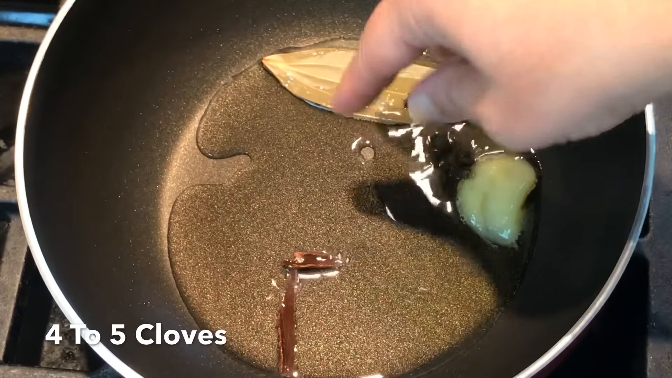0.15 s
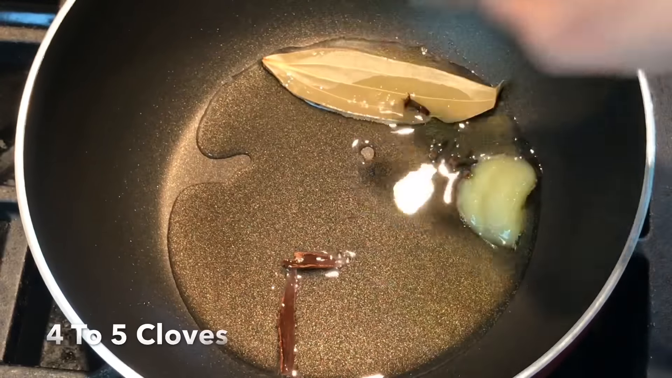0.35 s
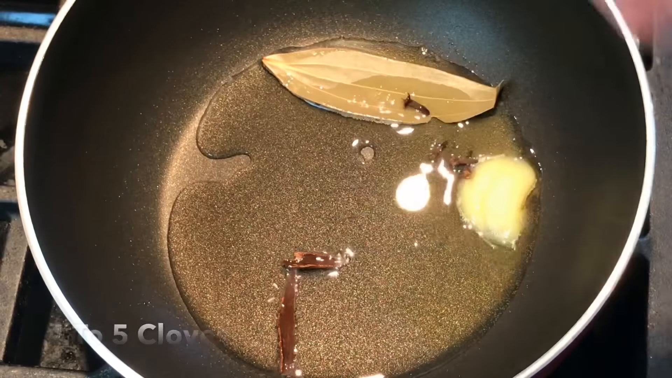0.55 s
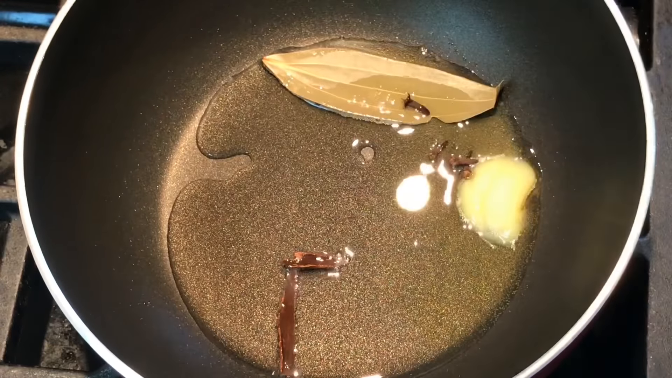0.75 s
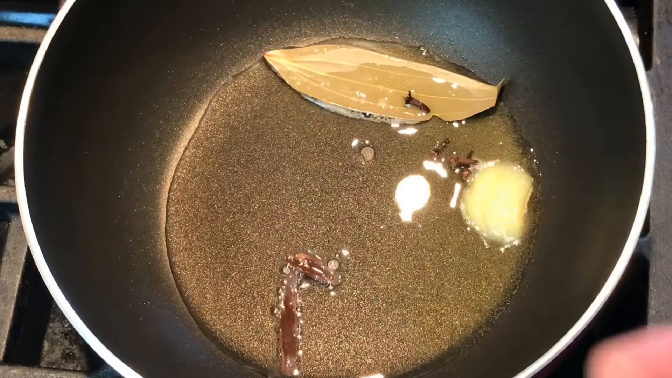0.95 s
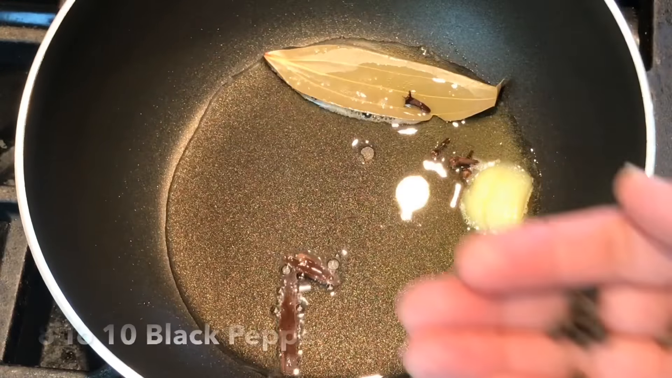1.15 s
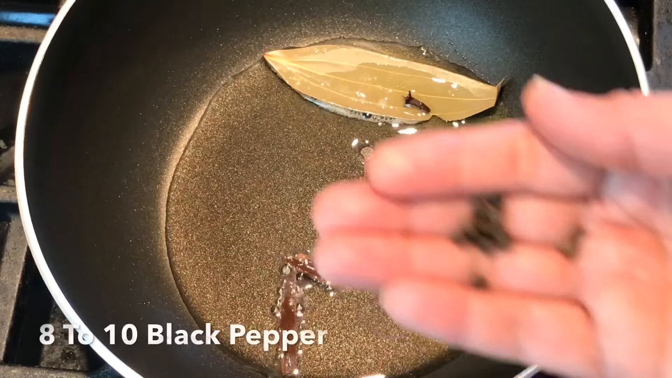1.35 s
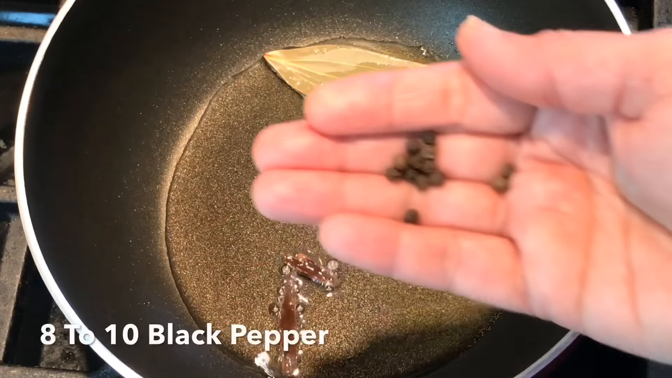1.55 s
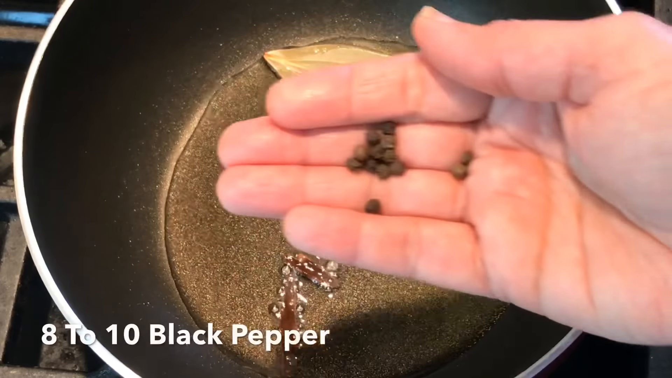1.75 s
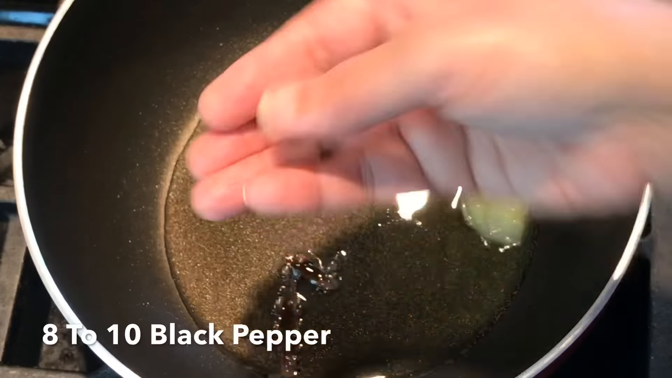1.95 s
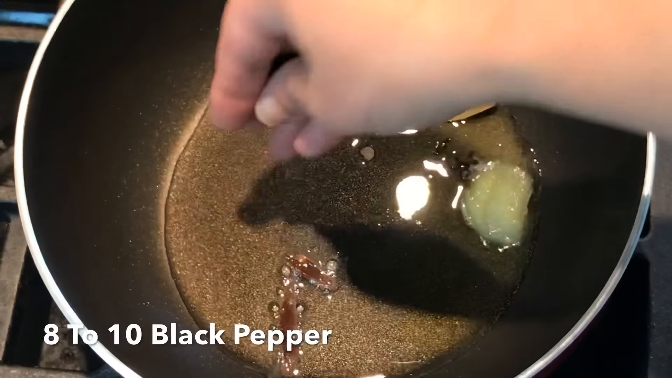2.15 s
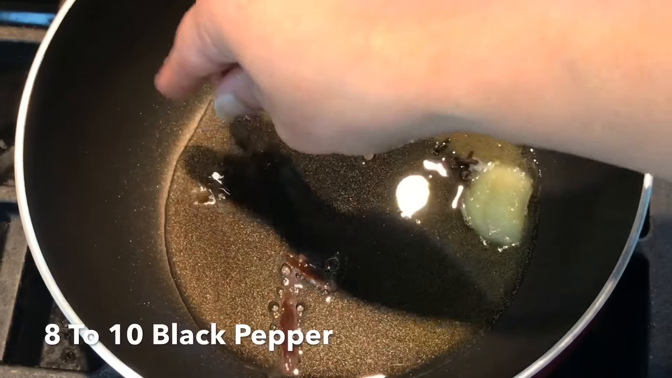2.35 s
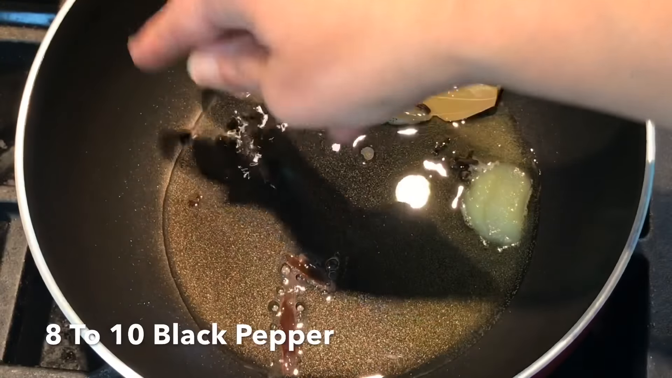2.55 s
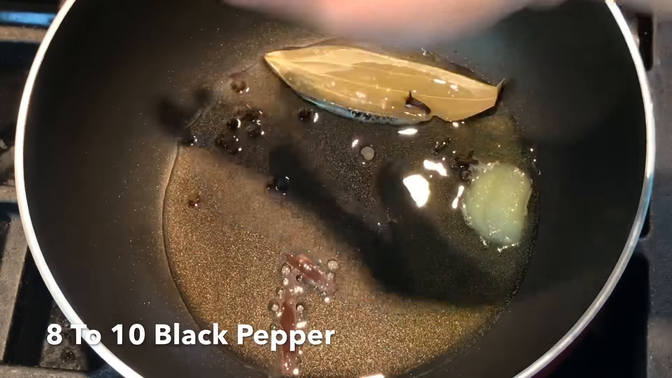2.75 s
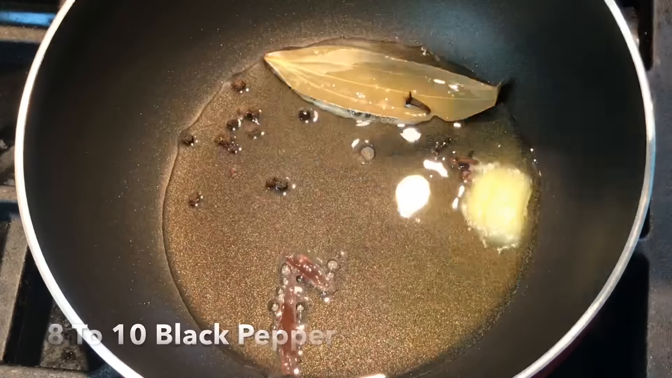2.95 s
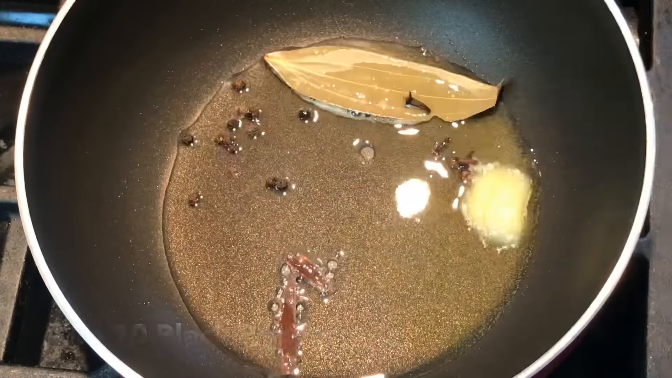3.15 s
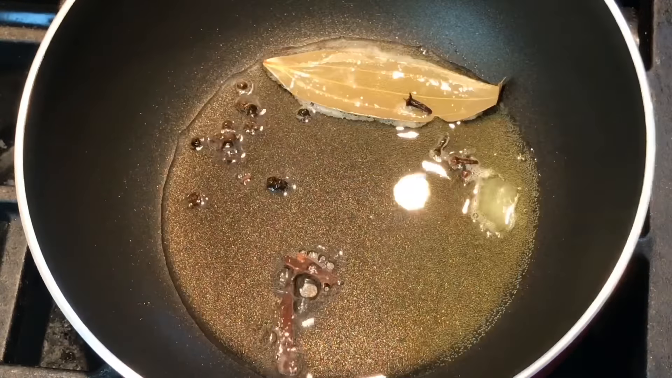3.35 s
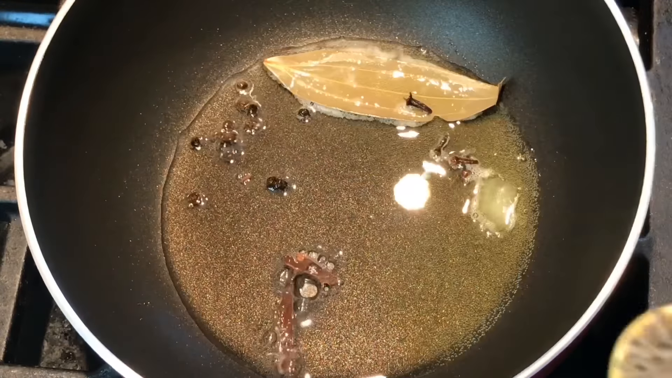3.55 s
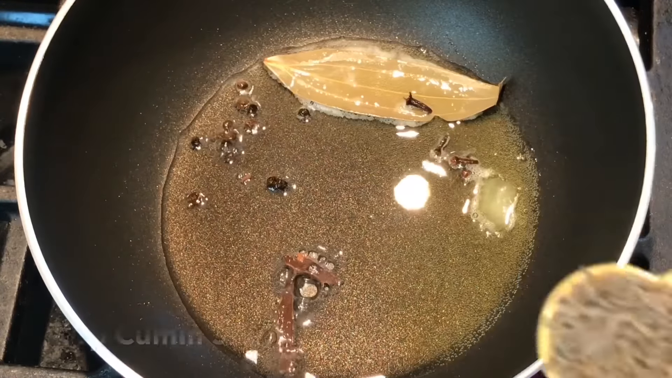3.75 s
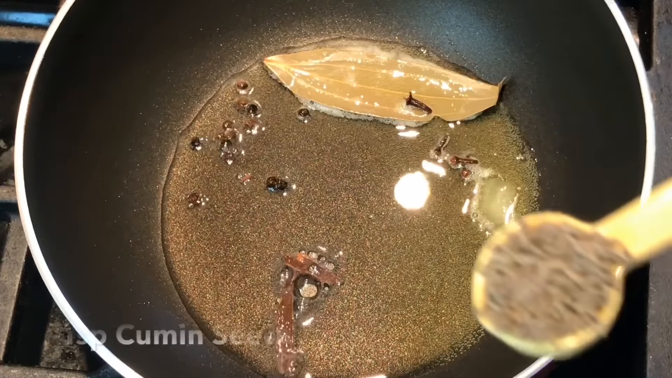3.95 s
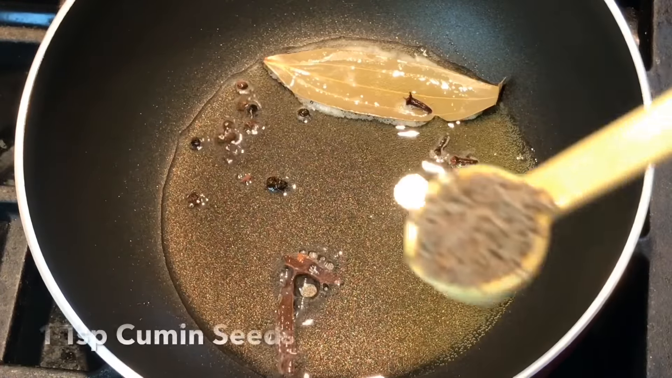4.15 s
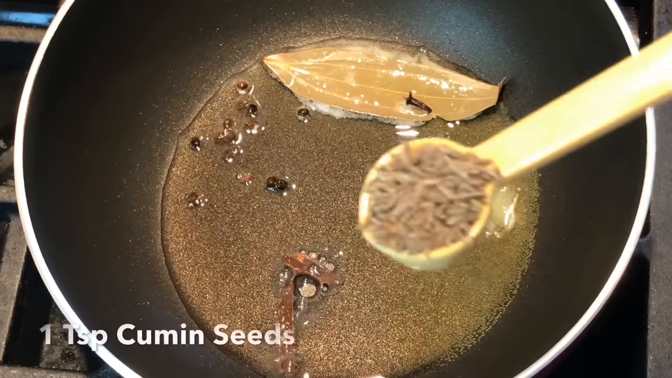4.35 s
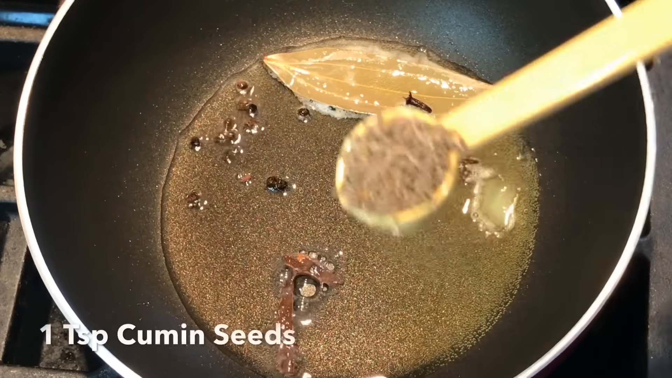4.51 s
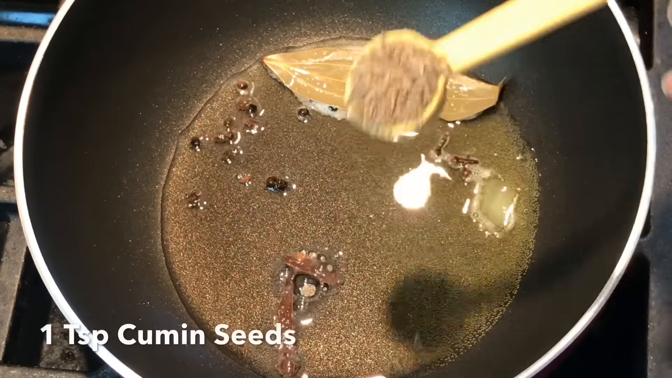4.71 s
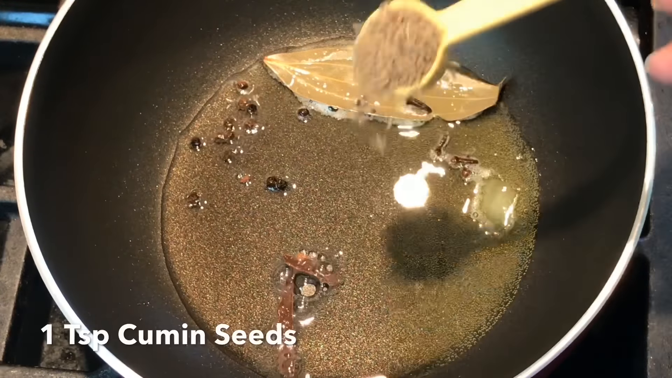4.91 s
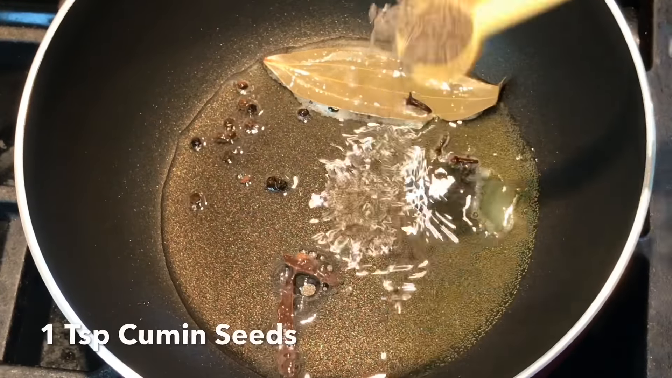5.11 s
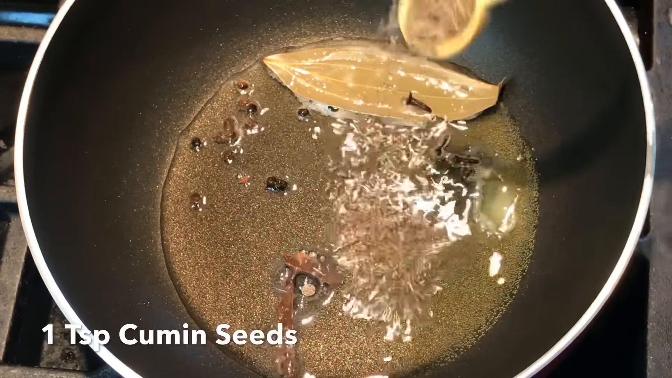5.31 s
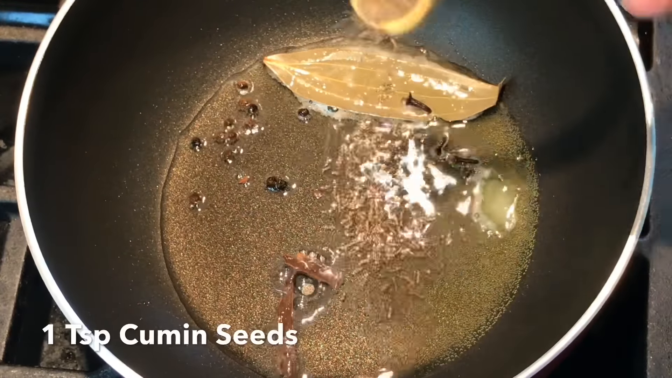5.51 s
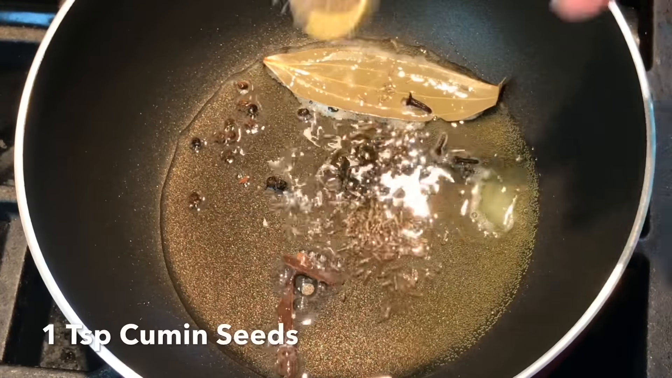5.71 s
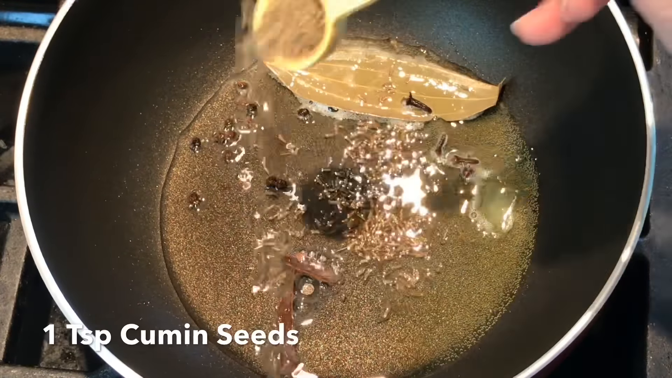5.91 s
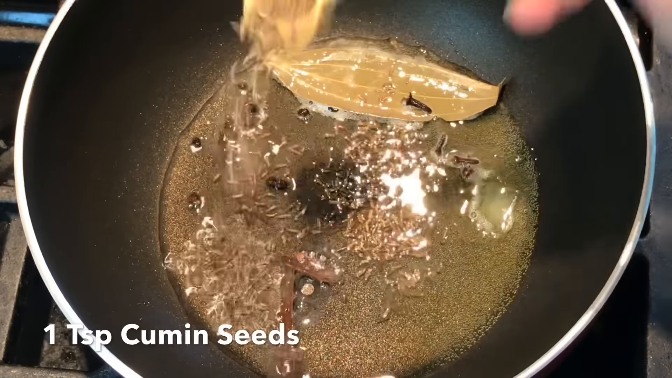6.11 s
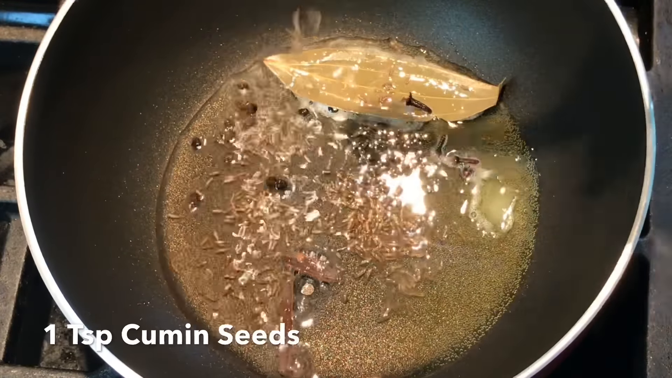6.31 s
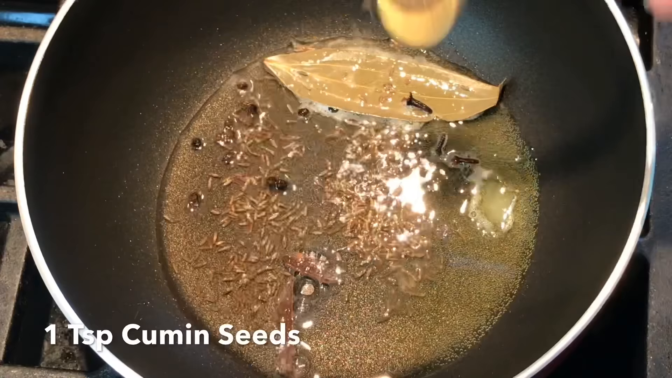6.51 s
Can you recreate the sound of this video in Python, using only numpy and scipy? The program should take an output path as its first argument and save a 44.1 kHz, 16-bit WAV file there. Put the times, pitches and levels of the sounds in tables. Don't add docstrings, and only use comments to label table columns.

```python
import sys
import numpy as np
from scipy import signal
from scipy.fft import rfft, irfft
from scipy.io import wavfile

SR = 44100
rng = np.random.default_rng(int(sys.argv[2]) if len(sys.argv) > 2 else 0)


def unload_wav(signal):
    wavfile.write(
        sys.argv[1],
        SR,
        np.round(np.clip(np.atleast_2d(signal).T, -1, 1) * 32767).astype(np.int16),
    )


def natural_amplitude(level_db):
    exponent = np.asarray(level_db, float) / 20
    return 10 ** exponent


N = 289737
CUTOFF_HZ = 15740
POUR_START_S = 5.12


def rms_one(x):
    return x / np.sqrt(np.mean(x ** 2) + 1e-20)


def at_hz(points, hz):
    point_hz, level_db = np.transpose(points)
    return np.interp(np.log(hz), np.log(point_hz), level_db)


def coloured(x, gain):
    hz = np.fft.rfftfreq(len(x), 1 / SR) + 1
    return rms_one(irfft(rfft(x) * gain(hz) * (hz < CUTOFF_HZ), len(x)))


def drift(rate):
    return coloured(rng.standard_normal(N), lambda hz: 1 / (1 + (hz / rate) ** 2))


def grains(per_s, spread_db):
    sizes = natural_amplitude(spread_db * np.minimum(rng.exponential(1, N), 4)) * rng.choice([-1, 1], N)
    return sizes * (rng.random(N) < per_s / SR)


def swells(rows):
    t = np.arange(N) / SR
    power = 0
    for s, hold, db, rise, fall in rows:
        early, late = np.maximum(s - t, 0), np.maximum(t - s - hold, 0)
        power = power + natural_amplitude(db - rise * early - fall * late) ** 2
    return np.sqrt(power)


def modes(table, t, tilt_db):
    hz, level_db, t60 = np.transpose(table)[:, :, None]
    scatter_db = 2.5 * rng.standard_normal(hz.shape)
    level_db = level_db + tilt_db(hz) + scatter_db - 60 * t / t60
    return np.sum(natural_amplitude(level_db) * np.sin(2 * np.pi * hz * t), axis=0)


# f/Hz, level/dB, t60/s
POT_LOW = [(1030, -13, .08), (1046, -6, .12), (1830, -10, .07), (1903, -1, .12), (1988, -9, .08),
           (2400, -16, .05), (3040, -9, .04)]
POT_HIGH = [(3850, -5, .03), (4600, -2, .03), (5000, -6, .03), (6165, 0, .04), (6430, -4, .04),
            (7027, -6, .06), (8600, -5, .03), (9030, -5, .04), (9450, -5, .03), (9720, -1, .05),
            (11050, -6, .03), (12400, -5, .03)]


def landings(rows, rattle_t60, metal_db):
    out, t = np.zeros(N + 6000), np.arange(6000) / SR
    hz = np.fft.rfftfreq(len(t), 1 / SR) + 1
    for s, peak_db, centre_hz, spread, rattle_db, ring_db in rows:
        def colour_db(f):
            return np.maximum(-3.5 * (np.log(f / centre_hz) / max(spread, .05)) ** 2, -18)

        noise_band = natural_amplitude(colour_db(hz)) * (hz > 2200) * (hz < CUTOFF_HZ)
        noise = rms_one(irfft(rfft(rng.standard_normal(len(t))) * noise_band, len(t)))
        echo_delay = np.exp(-2j * np.pi * hz * rng.uniform(.0003, .0008))
        bounce = 1 + .7 * rng.uniform(-1, 1) * echo_delay
        tick_band = natural_amplitude(.8 * colour_db(hz)) * (hz > 2000) * (hz < CUTOFF_HZ)
        lead_in = np.exp(-2j * np.pi * hz * .0002)
        tick = irfft(tick_band * bounce * lead_in, len(t)) * (t < .002)

        hit = tick / np.max(np.abs(tick))
        hit += natural_amplitude(rattle_db + 3.5) * noise * natural_amplitude(-60 * t / rattle_t60) * np.minimum(t / 0.000081, 1)
        hit += natural_amplitude(rattle_db + metal_db) * modes(POT_HIGH, t, lambda f: .7 * colour_db(f))
        hit += natural_amplitude(ring_db) * modes(POT_LOW, t, lambda f: 0 * f)
        at = round(s * SR)
        out[at:at + len(t)] += natural_amplitude(peak_db) * hit
    return out[:N]


# t/s, peak level/dB, centre f/Hz, rattle level re tick/dB
BIG = [(0.0244, -24, 5400, -11), (0.0725, -43, 2600, -10), (0.1097, -19.5, 9800, -18),
       (0.1917, -25.5, 4900, -11), (2.4203, -40, 8500, -4), (2.4625, -17, 11500, -21),
       (2.527, -31, 11500, -11), (2.5349, -22, 9300, -14), (2.5492, -32, 7400, -9),
       (2.5683, -19, 10000, -17), (2.5813, -12, 8800, -23), (2.6003, -24, 7900, -18),
       (2.6084, -27, 7200, -15), (2.6188, -32, 6200, -14), (2.6397, -25, 7000, -12),
       (2.6637, -33, 8200, -14), (2.7156, -43, 6700, -11)]


def cloves_and_peppercorns():
    rows = []
    for s, db, hz, rattle_db in BIG:
        ring_db = -47.5 + .45 * (db + 22.5) - db
        if s < 1:
            ring_db -= 5
        rows.append((s, db, hz, .34, rattle_db, ring_db))
    return landings(rows, rattle_t60=.032, metal_db=-8)


# t/s, peak level/dB, centre f/Hz
SEEDS = [(5.1228, -34, 9400), (5.1457, -32, 11200), (5.1578, -31, 9600), (5.1679, -30, 11200),
         (5.193, -21.5, 8200), (5.2122, -36, 7800), (5.2222, -28, 10000), (5.227, -33, 8600),
         (5.2376, -34, 9000), (5.2744, -32, 10600), (5.297, -33, 8700), (5.3071, -29, 8600),
         (5.3304, -32, 7000), (5.3383, -25, 7600), (5.3446, -23, 8700), (5.349, -25, 8600),
         (5.3717, -28, 11000), (5.4058, -28, 9300), (5.4187, -26, 8100), (5.4561, -30, 8500),
         (5.4726, -27, 10400), (5.4832, -19, 9500), (5.4998, -33, 8100), (5.5171, -21, 8600),
         (5.5219, -32, 6100), (5.5331, -33, 7400), (5.5417, -26, 7800), (5.5759, -34, 10200),
         (5.581, -38, 7500), (5.6317, -41, 9000),
         (5.6587, -26, 11300), (5.6889, -38, 10600), (5.699, -39, 8200), (5.7243, -39, 11300),
          (5.7378, -37, 10400), (5.7657, -33, 10900), (5.7924, -30, 9300), (5.8317, -37, 10800),
          (5.8573, -35, 10500), (5.866, -38, 8800), (5.9157, -35, 9700), (5.9799, -40, 9300),
          (6.0219, -38, 5800), (6.0356, -34, 11400), (6.0483, -31, 11000), (6.0709, -30, 10900),
          (6.0788, -33, 11400), (6.0976, -30, 7500), (6.1288, -39, 9000), (6.2558, -30, 9900),
          (6.3286, -31, 4500), (6.3616, -29.5, 8200), (6.3715, -33, 10300), (6.3853, -32, 8000),
          (6.4154, -24, 6300), (6.4228, -20, 6600), (6.4452, -26, 7200), (6.4813, -33, 8200),
          (6.544, -37, 11000), (6.551, -32, 5900)]


def seeds():
    pour_s = N / SR - POUR_START_S
    count = int(30 * pour_s)
    when, size, tone = rng.random(count), rng.standard_normal(count), rng.standard_normal(count)
    strays = np.c_[POUR_START_S + when * pour_s, -42 + 1.8 * size, 10500 * natural_amplitude(1.6 * tone)]
    rows = []
    for s, db, hz in [*SEEDS, *strays]:
        spread = .33 * rng.uniform(.75, 1.25)
        rattle_db = -16 - .5 * (db + 28.5)
        rows.append((s, db, hz, spread, rattle_db, -33))
    return landings(rows, rattle_t60=.015, metal_db=-7.5)


# t at full flow/s, hold/s, level/dB, body level/dB
SHOWERS = [(5.153, 0.045, -57, 0), (5.255, .055, -48, 2), (5.36, .014, -44, 0), (5.422, .02, -44, 3),
           (5.456, .012, -46, -2), (5.655, .01, -61, -4), (5.76, 0.011, -55, 1), (6.049, 0.055, -51.5, -4),
           (6.25, .022, -47, -12), (6.358, .04, -51.5, -3), (6.422, .008, -46, 2), (6.445, .004, -50, 3.5),
           (6.538, .01, -63, -5)]


def seed_flow(body):
    rows = [(s, hold, db + body * body_db, 300, 600) for s, hold, db, body_db in SHOWERS]
    trickle = (POUR_START_S, 9, -64 - 3 * body, 1000, 0)
    return swells(rows + [trickle])


# f/Hz, level per Hz/dB
PATTER_COLOUR = [(2500, -8), (3500, -11.5), (4800, -7.5), (6200, -5), (8000, -4.5), (9500, 2), (12000, -2),
                 (15700, -1)]


def patter():
    t = np.arange(6000) / SR
    ticks = grains(2400, spread_db=3.2) * natural_amplitude(2.5 * drift(50))
    pitches, dealt = np.geomspace(3500, 15000, 16), rng.integers(0, 16, N)
    blips = 0
    for k, pitch in enumerate(pitches):
        r = natural_amplitude(-60 * pitch / (16.0 * SR))
        w = 2 * np.pi * pitch / SR
        own_ticks = ticks * (dealt == k) + 1e-18
        ring = signal.lfilter([0, 1], [1, -2 * r * np.cos(w), r * r], own_ticks)
        blips = blips + ring * np.sin(w) * np.sqrt(1 - r)
    bright = coloured(blips, lambda hz: natural_amplitude(at_hz(PATTER_COLOUR, hz)))
    high = rms_one(signal.fftconvolve(ticks, modes(POT_HIGH, t, lambda f: 0 * f))[:N])
    low = rms_one(signal.fftconvolve(ticks, modes(POT_LOW, t, lambda f: 0 * f))[:N])
    shower = bright + natural_amplitude(-10) * high + natural_amplitude(-25) * low
    body_gain = 1 / (1 + (np.fft.rfftfreq(N, 1 / SR) / 7400) ** 8)
    body = irfft(rfft(shower) * body_gain, N)
    return seed_flow(body=1) * body + seed_flow(body=0) * (shower - body)


def swings(rows):
    out, t = np.zeros(N + 9000), np.arange(9000) / SR
    for s, peak_db, start_hz, end_hz, t60 in rows:
        pitch = end_hz + (start_hz - end_hz) * np.exp(-t / (.2 * t60))
        envelope = natural_amplitude(-60 * t / t60) * (1 - np.exp(-t / (.03 * t60)))
        swing = np.sin(2 * np.pi * np.cumsum(pitch) / SR) * envelope
        at = round(s * SR)
        out[at:at + len(t)] += natural_amplitude(peak_db) * swing / np.max(np.abs(swing))
    return out[:N]


# t/s, peak level/dB, f/Hz
RINGS = [(0.0242, -36, 4950), (0.0242, -32, 6060), (.0245, -37, 3035), (.025, -49.5, 1053),
         (.11, -47, 1053), (.1115, -34, 6130), (0.1929, -32, 4480), (0.1909, -28, 6150),
         (2.4625, -29, 12400), (2.5355, -33, 9720), (2.5535, -33, 6130), (2.569, -31, 9720),
         (2.582, -42, 3050), (2.64, -34, 6150), (2.5535, -40, 14000), (5.34, -42, 3050), (5.488, -38, 4800),
         (5.485, -40, 5150), (2.64, -47, 1046), (2.64, -45, 1903), (.025, -44, 1903), (6.4232, -32, 5100)]
# t/s, peak level/dB, start f/Hz
BUBBLES = [(.0725, -46, 2250), (2.549, -40, 4400), (2.5535, -40, 4300), (2.6397, -34, 4250),
           (5.168, -46, 2200), (5.193, -35, 4800), (5.334, -43, 1620), (5.632, -43, 4700),
           (6.098, -35, 2870), (6.3285, -37.5, 3020), (6.385, -41, 3000), (6.415, -36, 2294),
           (6.4225, -30, 2390), (6.4225, -40, 1740), (6.4225, -53, 1280), (6.4235, -30.5, 3050),
           (6.4245, -19.5, 7900), (6.446, -35, 2270)]


def rings_and_bubbles():
    rows = [(s, db, hz, hz, 114 / hz) for s, db, hz in RINGS]
    rows += [(s, db, hz, 1.033 * hz, 33 / hz) for s, db, hz in BUBBLES]
    return swings(rows)


# t/s, level/dB
FIZZ = [(0, -69.5), (.4, -70.5), (1.1, -68), (2.15, -70.5), (2.8, -66), (2.95, -69.5), (3.3, -67),
        (4.05, -68), (5.08, -65), (6.57, -70)]
# t at its height/s, hold/s, level/dB, build/(dB/s)
GUSHES = [
    (2.22, .01, -68, 150),
    (3.12, .075, -59.5, 150),
    (3.66, .03, -65, 60),
    (4.22, .05, -64, 50),
    (4.75, .02, -72, 50),
]


def fizz_level():
    s, level_db = np.transpose(FIZZ)
    steady = natural_amplitude(np.interp(np.arange(N) / SR, s, level_db, left=-120))
    return np.hypot(steady, swells([(*row, 300) for row in GUSHES]))


# f/Hz, level per Hz/dB
FIZZ_COLOUR = [(4000, -18), (6000, -3), (7000, -9.5), (7800, -9.5), (10000, -4.5), (13000, -6),
               (15700, -8.5)]


def fizz():
    bursts = coloured(grains(9000, spread_db=1.5), lambda hz: natural_amplitude(at_hz(FIZZ_COLOUR, hz)))
    return fizz_level() * natural_amplitude(0.62 * drift(24)) * bursts


# t/s, peak level/dB, start f/Hz, end f/Hz, t60/s
BUMPS = [
    (2.186, -42, 80, 45, .18),
    (4.026, -47, 70, 55, .1),
    (4.057, -47.5, 60, 50, .1),
    (4.3035, -47, 600, 250, .025),
    (3.958, -52, 720, 700, .04),
    (2.768, -51, 500, 300, .025),
]


def stand_bumps():
    return swings(BUMPS)


# f/Hz, level per Hz/dB
HOOD = [(15, -52), (30, -24), (58, 1), (110, -10.5), (250, -10), (500, -16.5), (900, -21.5), (1150, -24),
        (1600, -17), (2150, -24), (2700, -13.5), (3500, -26), (6500, -29), (7700, -50), (15700, -45)]
# f/Hz, width/Hz, level per Hz/dB
FLAME = [(59, 14.4, -2), (104, 24.5, -1.5), (230, 5.3, -14), (708, 210, -16), (1829, 140, -10),
         (1960, 45, -13.5), (2403, 13, -13), (2700, 26, -23.5), (2863, 37, -6.5), (2983, 30, -11),
         (3244, 25, -11.5), (3777, 146, -23), (4200, 130, -32.5), (5420, 115, -19.5), (6740, 410, -24),
         (8590, 290, -21), (9730, 330, -27.5), (11440, 340, -27.5), (14700, 11, -25)]


def hood_and_flame():
    hz = np.fft.rfftfreq(N, 1 / SR) + 1
    air, hiss = rfft(rng.standard_normal((2, N))) * (hz < CUTOFF_HZ)
    out = irfft(air * natural_amplitude(at_hz(HOOD, hz)), N)
    for centre_hz, width, db in FLAME:
        peak = natural_amplitude(db) / (1 + (2 * (hz - centre_hz) / width) ** 2) ** 0.78
        waver_db = 2.4 if centre_hz > 8000 else 1.4
        out += natural_amplitude(waver_db * drift(1.2)) * irfft(hiss * peak, N)
    return natural_amplitude(-56 + 0.53 * drift(3.8)) * rms_one(out)


def kitchen(x, t60):
    t = np.arange(SR // 2) / SR
    dull_noise = signal.lfilter([1], [1, -.3], rng.standard_normal(len(t)))
    tail = dull_noise * natural_amplitude(-60 * t / t60) * (t > .004)
    return signal.fftconvolve(x, tail / np.sqrt(np.sum(tail ** 2)))[:N]


def scene():
    spices = cloves_and_peppercorns() + patter() + seeds()
    thin = signal.butter(4, 890, "high", fs=SR, output="sos")
    spices = signal.sosfilt(thin, spices)
    room = natural_amplitude(-12.5) * kitchen(spices, t60=0.43)
    chirps = natural_amplitude(-2.0) * rings_and_bubbles()
    background = fizz() + hood_and_flame() + stand_bumps()
    return (spices + room + chirps + background)[None]


# t fade-out begins/s, t silent from/s, t silent until/s, t back in full/s
EDITS = [
    (0.8691, 0.866, 0.934, .958),
    (3.401, 3.428, 3.42, 3.464),
]


def scene_changes(x):
    t, floor = np.arange(N) / SR, natural_amplitude(-62)
    return x * np.prod([np.interp(t, row, [1, floor, floor, 1]) for row in EDITS], axis=0)


SHARP = [
    2.42,
    2.462,
    2.527,
    5.123,
    5.192,
    5.517,
    5.659,
    6.551,
]


def top_end(x):
    hz, t = np.fft.rfftfreq(N, 1 / SR), np.arange(N) / SR
    spectrum = rfft(x)
    below = irfft(spectrum * (hz < CUTOFF_HZ), N)
    above = irfft(spectrum * (hz >= CUTOFF_HZ) * (hz < 16650), N)
    opening = sum(np.exp(-((t - s - .001) / .003) ** 2) for s in SHARP)
    return below + opening * above


def top_cut(x):
    return signal.sosfilt(signal.butter(12, 16830, fs=SR, output="sos"), x)


def record(dry):
    mix = top_end(scene_changes(natural_amplitude(-0.75) * dry))
    return top_cut(mix)


dry = scene()
out = record(dry)
unload_wav(out)
```